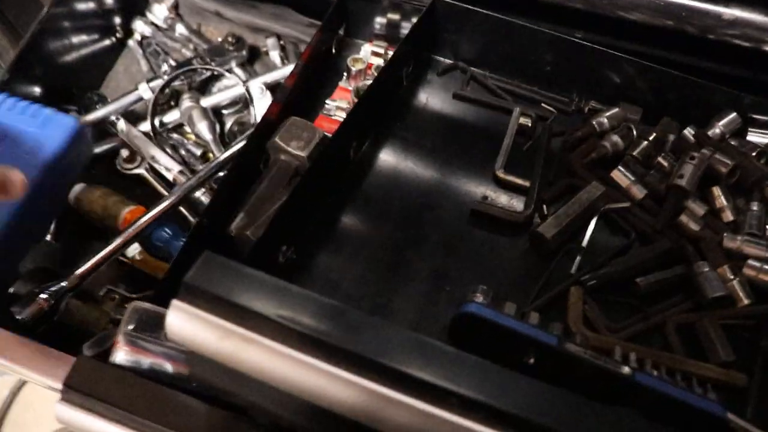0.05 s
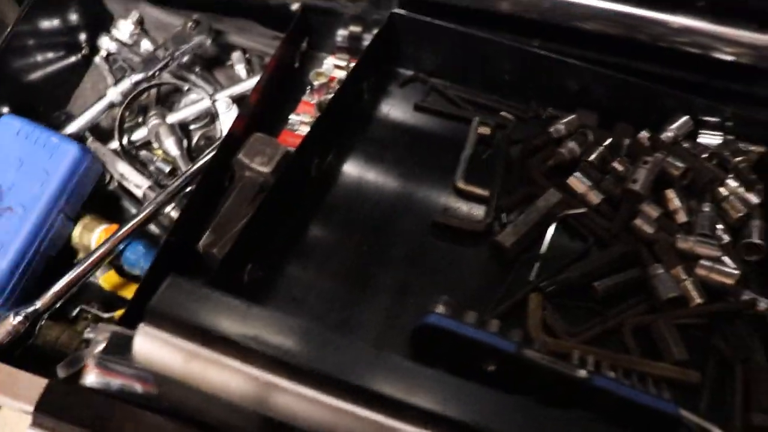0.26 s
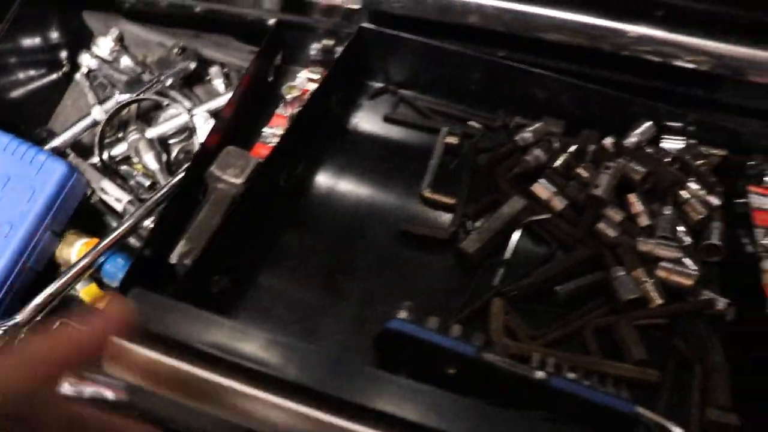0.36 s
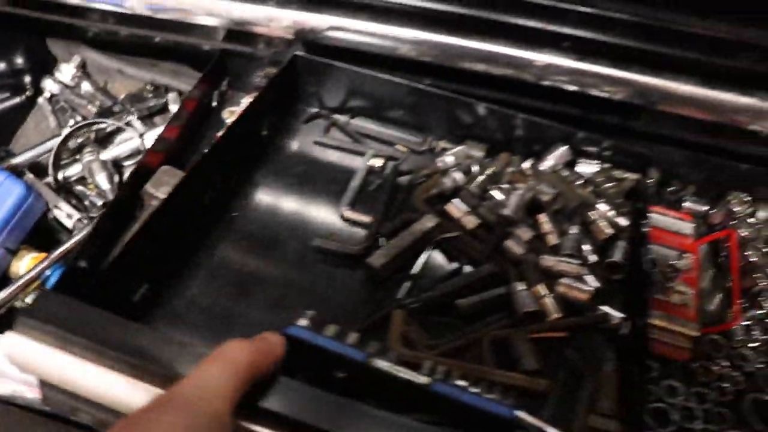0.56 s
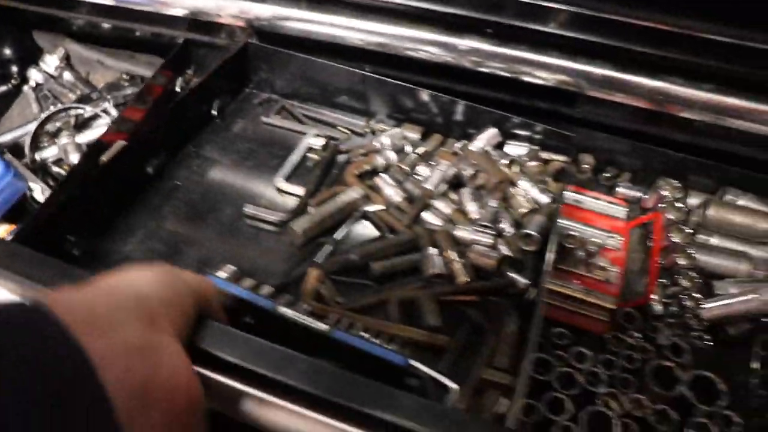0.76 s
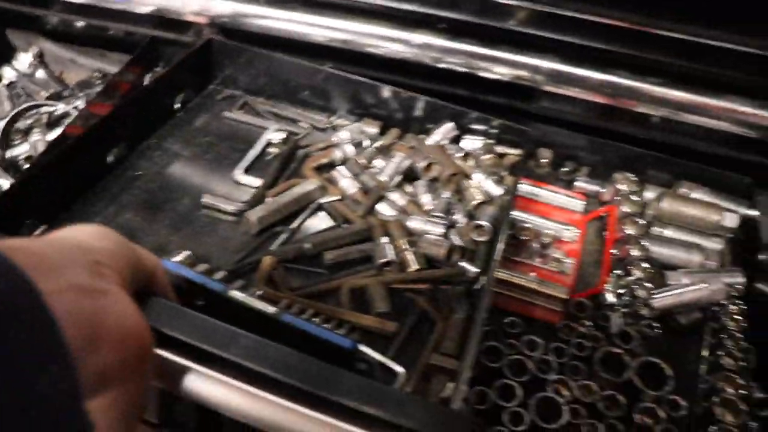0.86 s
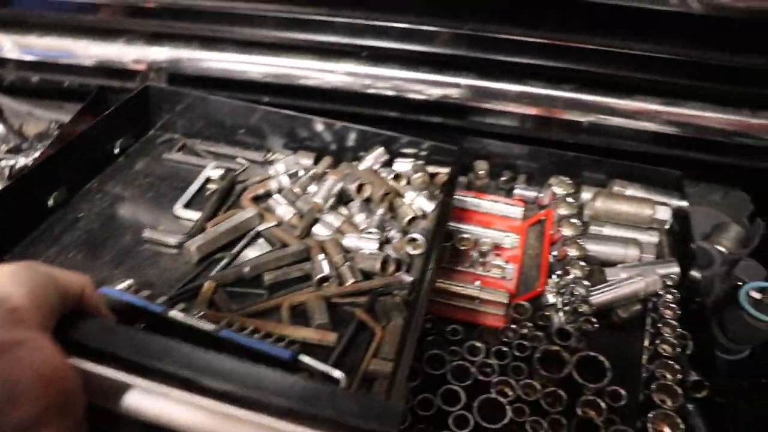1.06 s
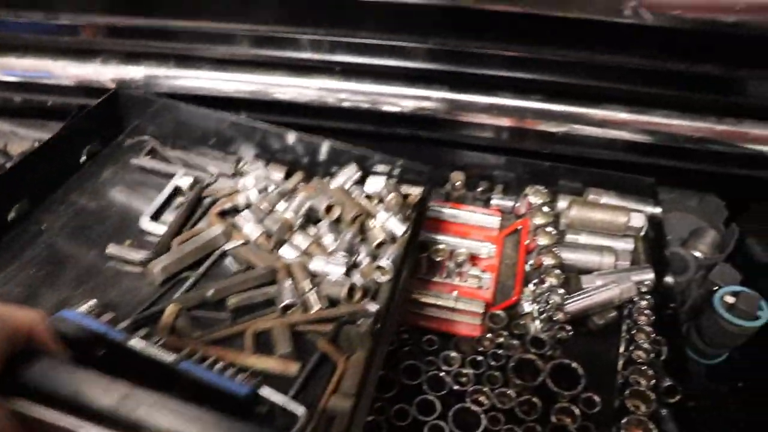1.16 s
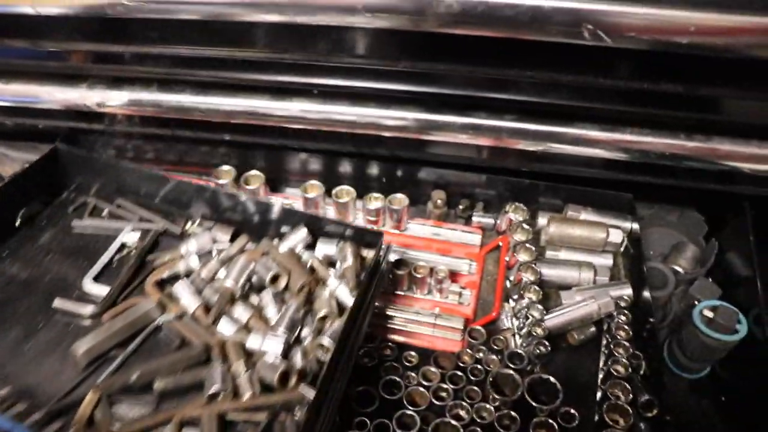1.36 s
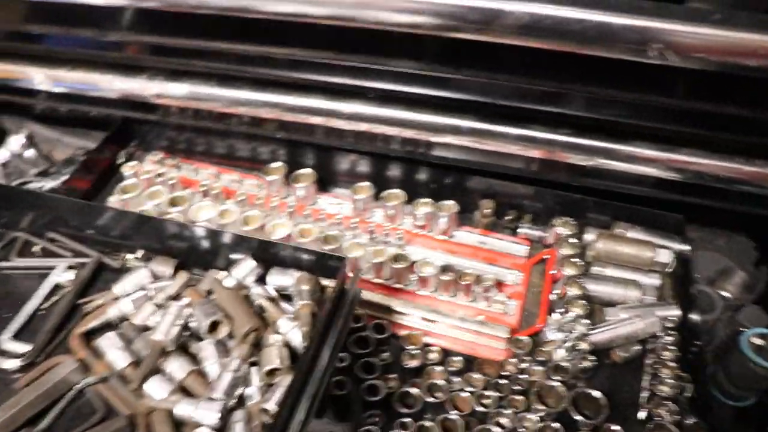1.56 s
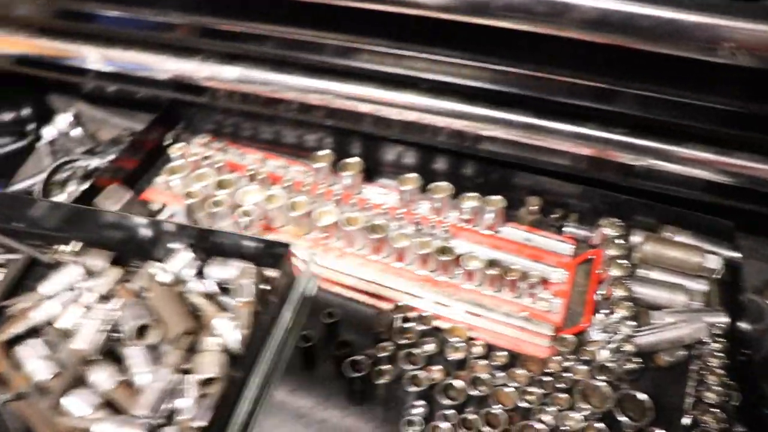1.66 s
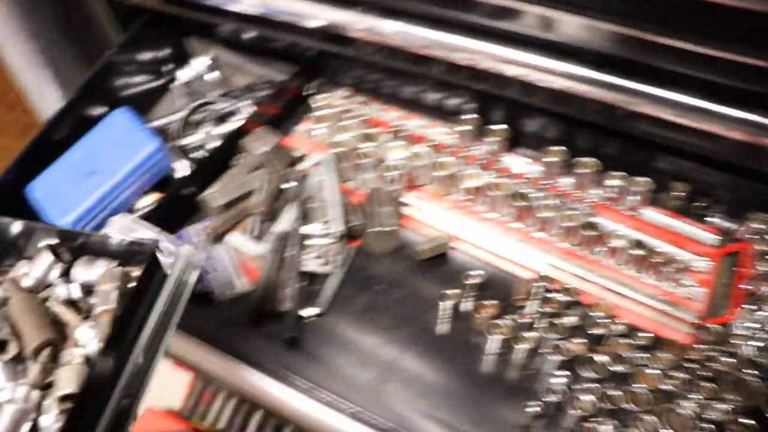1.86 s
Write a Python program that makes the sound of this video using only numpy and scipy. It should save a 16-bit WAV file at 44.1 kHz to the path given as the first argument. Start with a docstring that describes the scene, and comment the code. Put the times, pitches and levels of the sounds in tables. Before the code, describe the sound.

A steel tray of loose sockets is pushed across a tool-chest drawer. A soft brush near 0.1 s leads into a loud double clank at 0.2, then irregular bangs at 0.5, 0.62 and 0.9. Rattling and scraping thicken from 0.8 to 1.3, with a sharp hit at 1.23, more at 1.4 and 1.59, then faint taps after 1.8. Close, overloaded stereo, short workshop echo, quiet room tone.

```python
"""Steel tray in a tool chest

A loaded steel tray is slid and bumped by hand across a tool-chest drawer in a workshop.
Knocks shake the modelled sheet metal, sliding rumbles and scrapes through many tiny contacts,
and sockets clink as pairs of fading tones. A soft brush of noise comes before the first big knock.
Two close microphone ports hear it with room echo and room tone; the loudest knocks overload the recorder."""
import sys
import numpy as np
from scipy import signal
from scipy.fft import rfft, irfft, next_fast_len
from scipy.io import wavfile
from scipy.ndimage import map_coordinates

SR = 44100
rng = np.random.default_rng(int(sys.argv[2]) if len(sys.argv) > 2 else 0)


def digitize_waveform(pressure):
    """Quantize a signal to 16-bit integers and store it at the path in sys.argv[1].

    Rows of a 2-D input are taken as channels; values are limited to [-1, 1].
    """
    field = np.atleast_2d(pressure).T
    bounded = np.clip(field, -1, 1)
    quanta = np.round(bounded * 32767).astype(np.int16)
    wavfile.write(sys.argv[1], SR, quanta)


N = 83790

# Knocks of the tray and its load. Each row: start in seconds, overall level in dB, then the levels added
# for deep, boom, body, clack and tick in dB, left minus right in dB before PAN_SHARE, contact in seconds.
KNOCKS = [(0.025, -29.5, -18, -48, -31, -18, -8, 6, 0.0017),
          (0.178, -2.5, -7, -12, -7, -9, -23, 10, 0.0046),
          (0.203, -1, -42, -11.5, -6.5, -9.5, -21, 6, 0.0028),
          (0.239, -19, -9, -21, -9, -8.5, -16, 1, 0.0094),
          (0.357, -11, -30, -28, -7.5, -12, -20, 6.5, 0.0031),
          (0.383, -20, -4.5, -5.5, -14, -5.5, -5, 11.5, 0.0035),
          (0.4918, -5, -26, -18, -12, -9, -17, 8, 0.002), (0.511, -8.5, -24, -16, -15.5, -7, -16, 9, 0.001),
          (0.617, 1, -19, -36, -34, -20.5, -30.5, 8.5, 0.0023),
          (0.623, -16.5, -12, -6, -6, -11, -43, 3, 0.015),
          (0.635, -12.5, -25, -16, -5, -7, -46, -3.0, 0.0053),
          (0.723, -12.5, -30, -15, -8.5, -20.5, -52, -0.5, 0.012),
          (0.774, -12, -18, -9.5, -7, -11.5, -52, 0, 0.0052),
          (0.813, -24.5, -32, 2, -3, -22, -34, -4, 0.0029),
          (0.826, -18.5, -22, -2, -9, -5.5, -12.5, 1, 0.0041),
          (0.853, -17, -4, -4, -12, -11, -18, 7, 0.0032), (0.906, -6.5, -24, -6, -9, -16.5, -31, 3, 0.0045),
          (0.917, -7, -24, -6, -3.5, -3, -12.5, -3, 0.007),
          (0.946, -19, -27, -15, -17, -23, -14, 1, 0.0027), (0.987, -21, -7, -6, -14, -27, -21, 3, 0.0024),
          (1.13, -16.5, -30, -17, -6, -38, -18, 1, 0.002), (1.17, -25, -28, -12, -32, -14, -12, 6, 0.0028),
          (1.186, -17.5, -28, -15, -7, -10, -19, 2, 0.004), (1.213, -7, -32, -17, -11, -37, -36, 1, 0.0017),
          (1.228, 1, -18, -21, -9, -7, -6, 4, 0.0017), (1.275, -12.5, -37, -8.5, -28, -13, -12, 5, 0.0017),
          (1.292, -12, -50, -53, -9.5, -12, -11.5, 4, 0.0087),
          (1.37, -11, -31, -39, -11, -13.5, -15, 7, 0.0027),
          (1.397, -4.5, -13, -22.5, -13, -27, -25.5, 4, 0.0019),
          (1.414, -8, -46, -36, -9, -17, -28, 4, 0.0044), (1.563, -21, -34, -34, -13, -16, -14, 4, 0.0034),
          (1.576, -16, -18, -41, -30, -14, -11, 17, 0.0017),
          (1.586, -2, -49, -42, -17, -12, -14, 3.5, 0.0033),
          (1.794, -42.5, -14, -30, 1, -2, -28, 18, 0.0033),
          (1.829, -34.5, -11, -21, -7.5, -2.5, -36, 6, 0.0035),
          (1.875, -33, -36, -34, -7.5, -3.5, -24, 8, 0.003)]
# How fast a knock builds up. One column: rise in seconds, one row per register from deep to tick.
KNOCK_RISE_S = [0.0072, 0.0039, 0.00089, 0.00059, 0.00012]
# How far each register follows a knock's side. One column: share from 0 to 1, from deep to tick.
PAN_SHARE = [0.33, 0.29, 0.36, 0.7, 0.6]
# Sliding of the tray. Each row: time in seconds, then drive levels of the deep rumble, rumble,
# rattle and scrape in dB.
SLIDE = [(0, -80, -61, -59.5, -55), (0.098, -68, -47.5, -47.5, -55), (0.163, -35.5, -55, -53.5, -52.5),
         (0.221, -50, -26, -23, -24.5), (0.27, -36, -41, -32, -35.5), (0.34, -34.5, -35.5, -35, -43),
         (0.42, -35, -38, -35, -39.5), (0.47, -33.5, -39.5, -38.5, -45), (0.54, -35, -45.5, -40.5, -52),
         (0.59, -38, -46.5, -45.5, -44), (0.658, -47, -59, -28, -87), (0.705, -38, -49, -44.5, -49),
         (0.759, -34, -32, -30, -39.5), (0.84, -27.5, -32, -30, -38), (0.885, -36, -49, -30.5, -30.5),
         (0.94, -55, -29.5, -23.5, -29), (0.98, -66, -35.5, -33.5, -37.5), (1.04, -47, -42, -37, -38),
         (1.076, -44, -38, -35, -40), (1.101, -23.5, -27, -28, -39), (1.155, -56, -39.5, -31.5, -37.5),
         (1.2, -47, -34.5, -26.5, -34), (1.251, -40, -24.5, -21.5, -25.5), (1.284, -52, -44.5, -19.5, -23),
         (1.313, -57, -37, -35.5, -24), (1.349, -43, -77, -42, -50), (1.385, -71, -51, -28.5, -33),
         (1.432, -33, -36, -31, -37), (1.481, -33.5, -44, -34, -43.5), (1.53, -42.5, -33, -31, -40),
         (1.573, -38, -37, -24.5, -34), (1.61, -45, -58, -36, -55), (1.65, -49, -51.5, -49.5, -43),
         (1.75, -51.5, -52, -47, -48.5), (1.89, -65, -59, -58.5, -59)]
# Where the hand works. Each row: time in seconds, lead of the left port in microseconds,
# left minus right of the scrape in dB.
PLACE = [(0, 104, 5.5), (.58, 97, -0.5), (.63, -110, 11), (.8, -58, -3), (1.14, -39, 2), (1.2, 19.5, 1.5),
         (1.5, 40, -1), (1.58, 126, 2), (1.9, 73, 0)]
# Ringing tones of the sheet-steel tray and drawer. Each row: pitch in Hz, relative level in dB,
# time to fade by 60 dB in seconds.
STEEL_MODES = [(190, 2, 0.12), (215, 3, 0.12), (260, 3, 0.04), (345, 4, 0.1), (426.6, 0, 0.025),
               (441.6, -1.5, 0.089), (498, 5.5, 0.02), (850, -1, 0.025), (1000, 5, 0.022), (1165, 4, 0.017),
               (1585, 2, 0.021), (1700, 3.5, 0.025), (2016, -1, 0.013), (2450, 3.5, 0.026)]
# Tone colour of the scrape. Each row: frequency in Hz, relative level in dB per Hz.
SCRAPE_COLOUR = [(1470, -47), (2500, 5.5), (4300, -3), (9220, -7), (16000, -25.5)]
# Tones that stand out of single blows, from panel bongs to socket clinks. Each row: start in seconds,
# pitch in Hz, level of the main tone in dB, time to fade by 60 dB in seconds, left minus right in dB.
CLINKS = [(0.181, 1615, -5, 0.045, 4), (0.206, 1676, -3.5, 0.04, 5), (0.204, 375, -4.5, 0.07, 3),
          (.36, 1780, -14.5, 0.035, 6), (.495, 200, -10.5, 0.1, 2), (0.636, 385, -8, 0.05, 4),
          (.638, 250, -16, .1, 2), (.18, 255, -10, .05, 2), (.828, 483, -17.5, 0.14, 4),
          (.916, 404, 3, 0.04, 1), (1.228, 1700, -1, 0.026, -7), (1.228, 165.5, -22, 0.18, 2),
          (1.23, 509, -16, 0.15, 6), (0.4918, 3250, -6, 0.014, 20), (.626, 4250, -24, .05, 5),
          (.724, 480, -13, 0.05, 0), (.76, 450, -19, .03, 0), (.811, 470, -16, .04, 0),
          (1.587, 1680, -5, 0.024, 2), (1.586, 5360, -21.5, 0.019, 25), (1.09, 970, -13, 0.03, 1),
          (1.088, 400, -17, .08, 1), (.386, 9400, -45, 0.18, 5), (1.215, 980, -14, .025, 1),
          (1.291, 960, -14, .03, 1), (1.266, 520, -18, .06, 2), (1.414, 1100, -16, .025, 2),
          (1.505, 1250, -23, .03, 1), (1.537, 900, -22, .03, 1), (.07, 364, -41, 0.8, 3),
          (.325, 335, -20, 0.3, 4), (.378, 345, -18, .25, 4), (.52, 335, -22, .12, 3),
          (1.133, 890, -15.5, 0.034, 1), (1.397, 1152, -15, 0.045, 4), (.492, 2900, -10, .018, -8),
          (.494, 4950, -17, 0.04, -14), (.511, 9950, -19, 0.012, 11), (.511, 5700, -16, .012, 14),
          (.514, 12530, -37, 0.1, 4), (.616, 6290, -12.5, 0.018, -12), (.726, 2450, -17, .04, -4),
          (.777, 2450, -17, 0.046, -2), (.828, 4000, -29, 0.053, 11), (1.187, 11120, -23, 0.1, -1),
          (1.197, 11120, -26, .07, -1), (1.188, 5250, -30.5, .15, 0), (1.314, 14570, -35, .09, 14),
          (1.395, 13700, -29, 0.049, 4), (1.593, 14570, -22, .1, 7), (1.832, 1700, -32, 0.038, 5),
          (1.879, 1700, -29.5, .035, 8), (1.877, 4220, -32, 0.041, 9)]
# Tone colour of the brush. Each row: frequency in Hz, relative level in dB per Hz.
BRUSH_COLOUR = [(700, -30), (997, -15), (1560, -5), (3030, -11), (9600, -10), (16000, -21)]
# Tone colour of the room tone. Each row: frequency in Hz, relative level in dB per Hz.
ROOM_TONE_COLOUR = [(15, -44), (25, 13.5), (190, 0), (500, -14), (988, -17), (2000, -15), (7310, -9),
                    (16000, -43)]
# How alike the two ports sound. Each row: frequency in Hz, likeness from 0 (unrelated) to 1 (same).
LIKENESS = [(45, 0.6), (100, 1), (700, 0.88), (1500, 0.65), (3000, 0.24), (6000, 0.5), (13000, 0.17)]

KNOCK_FALL_S = 0.0034   # time constant of the fall
FIRST_BLOW_DB = 13   # the single hard contact that opens each knock, against the run that follows
CONTACTS_PER_S, CONTACT_SPREAD_DB = 6000, 2.5
TUMBLES_PER_S, LUMPS_PER_S, LUMPS_DB = 1500, 40, 2   # the sliding load: coarser contacts, in clumps
DEEP_HZ, BOOM_HZ, BODY_HZ, CLACK_HZ, TICK_HZ = 161.2, 300, 653, 3020, 6670   # lower edges of registers
TICK_TOP_HZ = 13400
DENSE_DB = -1   # the many closely packed modes, heard as noise, against the clear ones
THUD_DB, THUD_HZ = -24, 66   # the push of air under the deep register, and its lower edge
CLINK_RISE_CYCLES, CLINK_ROOM_DB = 0.8, -10   # clinks get less room echo, so that they stay short
PARTNER, PARTNER_RATIO = 0.35, 1.003   # second tone of a clink: strength and pitch against the first
BRUSH_S, BRUSH_RISE_S, BRUSH_FALL_S, BRUSH_DB = 0.096, 0.023, 0.009, -30.5   # BRUSH_S is its peak
ROOM_DB, ROOM_T60_S, WALL_CUT_HZ = -14, 0.17, 10700
ROOM_TONE_DB = -50
HISS_DB, HISS_LOW_HZ = -56, 8000   # of the recorder, separate in each channel
CLIP_TOP, CLIP_HARD = 1.0, 4   # ceiling, and how sharply peaks bend under it
MIC_LOW_HZ, CUTOFF_HZ = 61.3, 16250


def amp(db):
    """Turn a level in dB into a gain."""
    return 10 ** (np.asarray(db) / 20)


def rms_one(x):
    """Scale a sound to an rms (average strength) of 1."""
    return x / np.sqrt(np.mean(x ** 2) + 1e-20)


def at_hz(points, hz):
    """Read a table between its points, with frequency spaced as the ear hears pitch."""
    table = np.array(points)
    return np.interp(np.log(hz + 1), np.log(table[:, 0]), table[:, 1])


def coloured(x, colour):
    """Give noise a tone colour by weighting its frequencies; the rms becomes 1."""
    gain = amp(at_hz(colour, np.fft.rfftfreq(N, 1 / SR)))
    return rms_one(irfft(rfft(x) * gain, N))


def three_rows():
    """Make steady noise in three rows: left, right like the left, and right only."""
    return rng.standard_normal((2, N))[[0, 0, 1]]


def sides(pan_db):
    """Gains of the three rows for a sound lying pan_db louder on the left."""
    return amp(np.array([[0.5], [-0.5], [-0.5]]) * pan_db)


def tray():
    """Knocks and sliding drive the same sheet steel, one pitch register at a time."""
    deep_knocks = knock_force(0)
    deep, rumble, rattle = sliding_forces()
    thud = amp(THUD_DB) * steel(deep_knocks, THUD_HZ, DEEP_HZ)
    low = steel(deep_knocks + deep, DEEP_HZ, BOOM_HZ)
    boom = steel(knock_force(1) + rumble, BOOM_HZ, BODY_HZ)
    body = steel(knock_force(2) + rattle, BODY_HZ, CLACK_HZ)
    clack = steel(knock_force(3), CLACK_HZ, TICK_HZ)
    tick = steel(knock_force(4), TICK_HZ, TICK_TOP_HZ)
    return thud + low + boom + body + clack + tick + scrape()


def knock_force(register):
    """Every knock is one hard contact and a short run of smaller ones: rise, hold, fall."""
    run, first = np.zeros((3, N)), np.zeros((3, N))
    t = np.arange(int(0.06 * SR)) / SR
    for start_s, level_db, *register_db, pan_db, length_s in KNOCKS:
        rise = np.minimum(t / KNOCK_RISE_S[register], 1)
        fall = np.exp(-np.maximum(t - length_s, 0) / KNOCK_FALL_S)
        gain = sides(pan_db * PAN_SHARE[register]) * amp(level_db + register_db[register])
        i = int(start_s * SR)
        run[:, i:i + len(t)] += (gain * rise * fall)[:, :N - i]
        first[:, i] += amp(FIRST_BLOW_DB) * gain[:, 0]
    return run * contacts() + first


def contacts(per_s=CONTACTS_PER_S):
    """Metal touches metal in many uneven tiny hits, at random moments, in three rows."""
    spread_db = CONTACT_SPREAD_DB * np.minimum(rng.exponential(1, (2, N)), 5)
    sizes = amp(spread_db) * rng.standard_normal((2, N))
    hits = rng.random((2, N)) < per_s / SR
    return rms_one(sizes * hits)[[0, 0, 1]]


def steel(force, low_hz, high_hz):
    """Sheet metal answers a force with clear ringing modes plus many packed ones, heard as noise."""
    band = signal.butter(3, [low_hz, high_hz], "band", fs=SR, output="sos")
    # A single click rides along as a last row, to show how strongly the steel answers.
    probe = np.vstack([force, np.arange(N) == 0])
    answer = signal.sosfilt(band, probe + 1e-18)
    answer = answer / np.linalg.norm(answer[-1])
    modes = []
    for k, (hz, db, t60) in enumerate(STEEL_MODES):
        if low_hz < hz < high_hz:
            modes.append(amp(db) * (-1) ** k * ring(probe, hz, t60))
    if modes:
        clear = sum(modes)
        answer = amp(DENSE_DB) * answer + clear / np.linalg.norm(clear[-1])
    return answer[:-1]


def ring(x, hz, t60):
    """One mode: a resonator that rings at its own pitch and fades by 60 dB in t60 seconds."""
    shrink = amp(-60 / (max(t60, 0.005) * SR))
    turn = 2 * np.pi * hz / SR
    return signal.lfilter([0, np.sin(turn)], [1, -2 * shrink * np.cos(turn), shrink ** 2], x + 1e-18)


def sliding_forces():
    """The sliding load tumbles in clumps of coarse contacts: deep rumble, rumble and rattle."""
    t = np.arange(N) / SR
    time_s, *levels_db = np.transpose(SLIDE)
    return [amp(np.interp(t, time_s, db)) * lumps() * contacts(TUMBLES_PER_S) for db in levels_db[:3]]


def lumps():
    """The load catches and lets go: a quick random swell."""
    place = np.arange(N) / SR * LUMPS_PER_S
    steps = rng.standard_normal(int(N / SR * LUMPS_PER_S) + 3)
    return amp(LUMPS_DB * np.interp(place, np.arange(len(steps)), steps))


def scrape():
    """Sliding metal scrapes: dense tiny contacts given a bright tone colour."""
    t = np.arange(N) / SR
    slide, place = np.transpose(SLIDE), np.transpose(PLACE)
    rubbing = amp(np.interp(t, slide[0], slide[4])) * contacts()
    strength = np.sqrt(np.mean(rubbing ** 2))   # colouring resets the rms, so put it back
    return sides(np.interp(t, place[0], place[2])) * strength * coloured(rubbing, SCRAPE_COLOUR)


def clinks():
    """Each clink or bong is a close pair of tones, slightly apart in pitch, that fade together."""
    out, t = np.zeros((3, N)), np.arange(int(0.4 * SR)) / SR
    for start_s, hz, db, t60, pan_db in CLINKS:
        main = np.sin(2 * np.pi * hz * t)
        partner = PARTNER * np.sin(2 * np.pi * (hz * PARTNER_RATIO * t + rng.random()))
        rise = np.minimum(t / max(0.0004, CLINK_RISE_CYCLES / hz), 1)
        tone = (main + partner) * amp(db - 60 * t / t60) * rise
        i = int(start_s * SR)
        out[:, i:i + len(t)] += (sides(pan_db) * tone)[:, :N - i]
    return out


def brush():
    """A light brush: soft bright noise that swells and then drops faster."""
    t = np.arange(N) / SR - BRUSH_S
    width_s = np.where(t < 0, BRUSH_RISE_S, BRUSH_FALL_S)
    shape = np.exp(-0.5 * (t / width_s) ** 2)
    return amp(BRUSH_DB) * shape * sides(3.3) * coloured(three_rows(), BRUSH_COLOUR)


def workshop(x):
    """The room's echoes blur together: a dull, fading noise tail for each port."""
    t = np.arange(int(0.5 * SR)) / SR
    fade = amp(-60 * t / ROOM_T60_S) * np.minimum(t / 0.0027, 1)
    tail = rng.standard_normal((2, len(t))) * fade
    dull = np.exp(-2 * np.pi * WALL_CUT_HZ / SR)
    tail = signal.lfilter([1], [1, -dull], tail)
    return signal.fftconvolve(x, tail[[0, 0, 1]] / np.linalg.norm(tail[0]), axes=1)[:, :N]


def room_tone():
    """The steady background of the workshop: quiet noise, strongest in the bass."""
    return amp(ROOM_TONE_DB) * coloured(three_rows(), ROOM_TONE_COLOUR)


def two_ports(rows):
    """Sound reaches the ports at slightly different times, and their likeness varies with pitch."""
    size = next_fast_len(N + 4096)
    _, shared, own = rfft(rows, size)
    alike = np.clip(at_hz(LIKENESS, np.fft.rfftfreq(size, 1 / SR)), 0, 1)
    right = irfft(alike * shared + np.sqrt(1 - alike ** 2) * own, size)[:N]
    # Positive samples make the right port late, negative ones make it early.
    late = np.interp(np.arange(N) / SR, *np.transpose(PLACE)[:2]) * SR / 1e6
    right = map_coordinates(right, [np.arange(N) - late], order=5, mode="nearest")
    return np.array([rows[0], right])


def scene():
    """Add up the sources, their room echo and the room tone, as the two ports hear them."""
    near, tones = tray() + brush(), clinks()
    echo = amp(ROOM_DB) * workshop(near + amp(CLINK_ROOM_DB) * tones)
    return two_ports(near + tones + echo + room_tone())


def record(dry):
    """The input hisses a little, loud peaks are squashed, deep bass and the top are cut."""
    hiss_filter = signal.butter(1, HISS_LOW_HZ, "high", fs=SR, output="sos")
    hiss = signal.sosfilt(hiss_filter, rng.standard_normal(dry.shape))
    fed = dry + amp(HISS_DB) * hiss
    squashed = fed / (1 + np.abs(fed / CLIP_TOP) ** CLIP_HARD) ** (1 / CLIP_HARD)
    bass_cut = signal.butter(2, MIC_LOW_HZ, "high", fs=SR, output="sos")
    top_cut = signal.cheby2(18, 45, CUTOFF_HZ, fs=SR, output="sos")   # 45 dB down from CUTOFF_HZ up
    heard = signal.sosfilt(top_cut, signal.sosfilt(bass_cut, squashed))
    return np.clip(heard, -CLIP_TOP, CLIP_TOP)


dry = scene()
out = record(dry)
digitize_waveform(out)
```